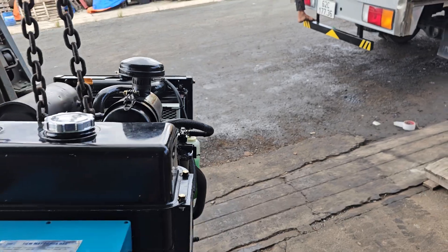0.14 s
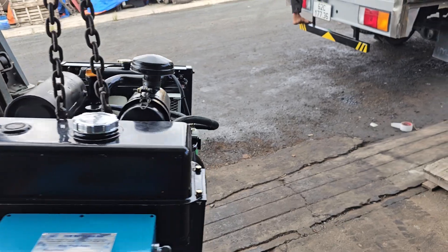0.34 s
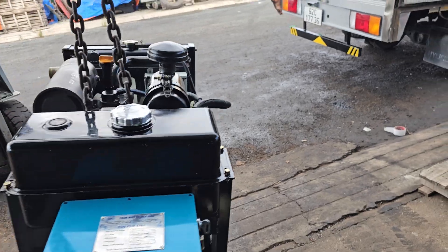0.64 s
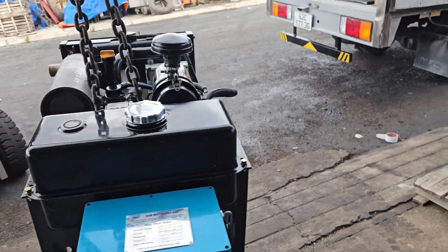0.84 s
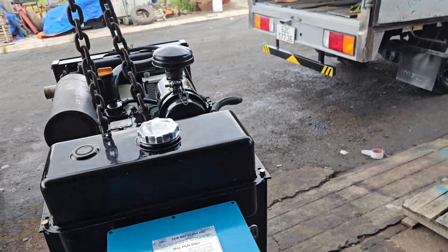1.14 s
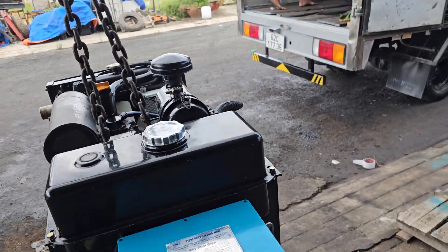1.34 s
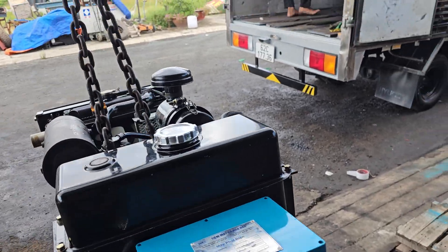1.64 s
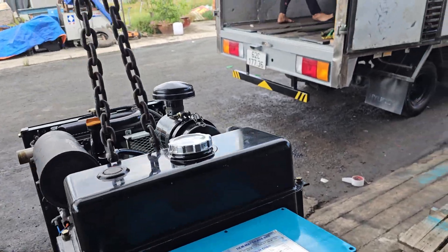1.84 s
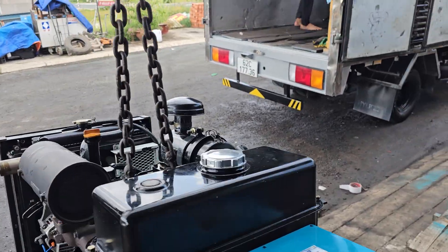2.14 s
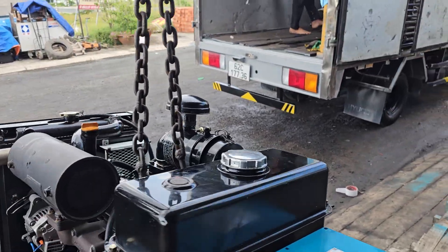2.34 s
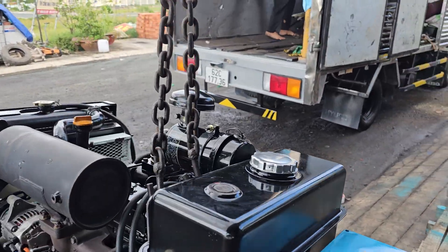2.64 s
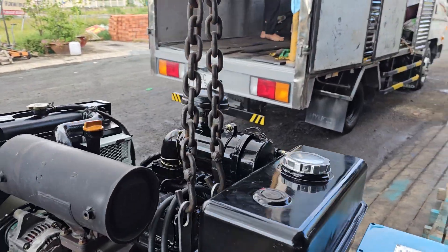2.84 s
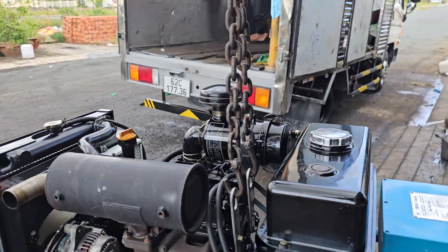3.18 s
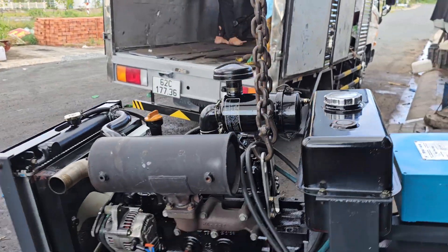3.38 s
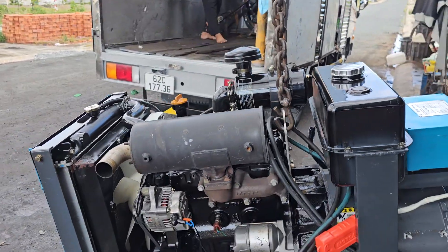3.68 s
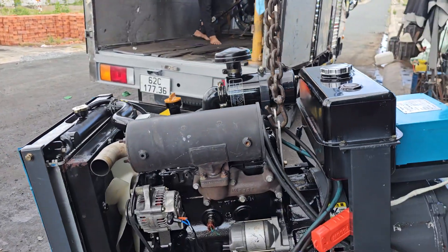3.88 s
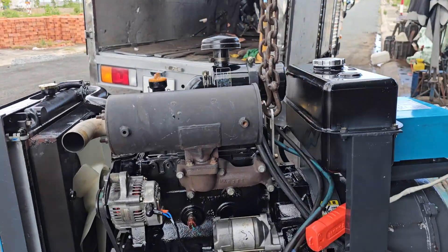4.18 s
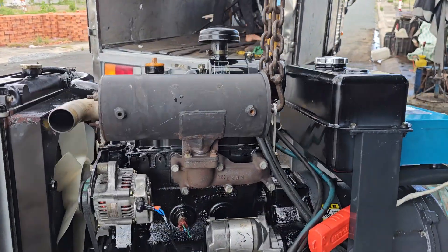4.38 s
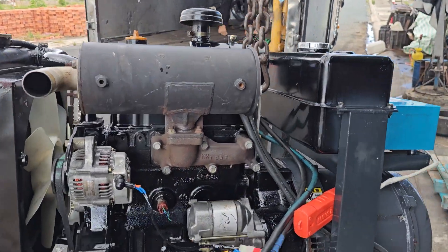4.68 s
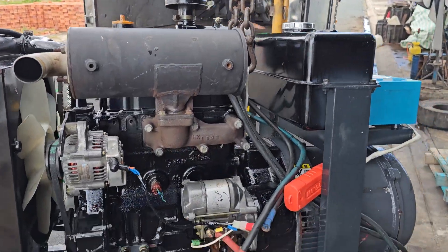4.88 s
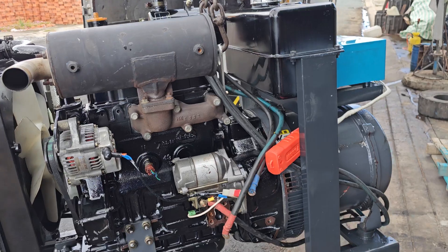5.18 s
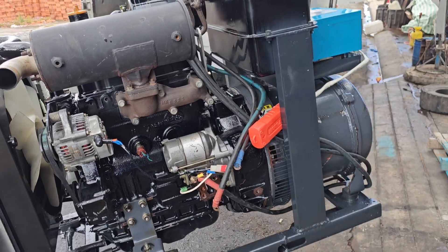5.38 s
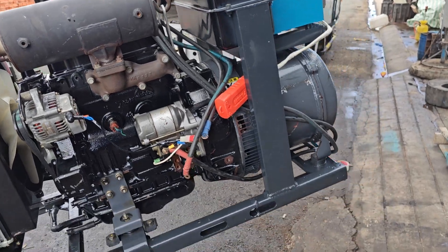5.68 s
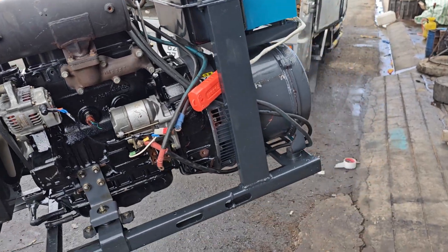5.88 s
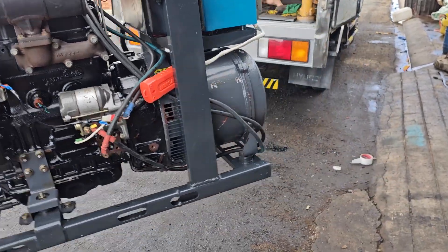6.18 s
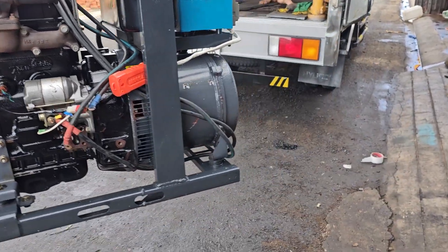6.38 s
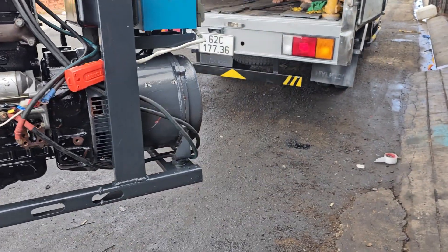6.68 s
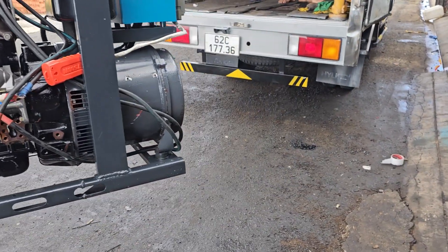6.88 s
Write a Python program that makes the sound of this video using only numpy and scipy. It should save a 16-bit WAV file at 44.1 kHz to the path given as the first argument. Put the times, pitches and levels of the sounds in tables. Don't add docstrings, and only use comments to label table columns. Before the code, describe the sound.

A diesel forklift clatters and knocks at lifting revs with a pulsing high hydraulic whine, a brief squeak, chain clinks and a late metallic jolt.

```python
import sys
import numpy as np
from scipy import signal
from scipy.fft import rfft, irfft, next_fast_len
from scipy.io import wavfile
from scipy.ndimage import uniform_filter1d, minimum_filter1d, map_coordinates

SR = 44100
rng = np.random.default_rng(int(sys.argv[2]) if len(sys.argv) > 2 else 0)


def master(y):
    cut = np.clip(np.atleast_2d(y).T, -1, 1)
    pcm = np.round(cut * 32767)
    wavfile.write(sys.argv[1], SR, pcm.astype(np.int16))


def voltage_ratio(level):
    return 10 ** (np.asarray(level, float) / 20)


N = 309582

# t/s, firings so far/count
CRANK = [(0.0, 0.5), (0.4, 9.17), (0.8, 17.98), (1.0, 22.14), (1.2, 26.45), (1.4, 30.51), (1.8, 39.22),
         (2.2, 48.64), (2.4, 53.62), (3.0, 68.87), (3.2, 73.79), (3.4, 78.25), (3.6, 82.35), (4.0, 90.64),
         (4.4, 98.76), (5.4, 119.46), (6.2, 135.92), (7.02, 152.74)]
# t/s, bearing round the truck/deg, effort/dB, oil pressure/dB, tailpipe nearness/dB
WALK = [(0, 40, -17.5, -12, -16), (.42, 82, -2.5, 5, -5), (.75, 52, 9, 7.5, 0.5), (1.15, 89, 2, 2, -1.5),
        (1.5, 30, 3.5, .5, 0), (1.85, 38, -3.5, -1.5, -2.5), (2.2, 22, -2.5, -4.5, 0),
        (2.55, 34, -4, 1, 1.5), (3.38, 3.6, -4, -6.5, 2.2), (3.62, 93, -4, 2.5, 1.5),
        (4.05, 138, -0.5, 4, 3.5), (4.3, 153, -3, -4, 2), (4.9, 154, -1, -1, 2.5), (5.47, 163, -2, 2, 2),
        (5.7, 261, 1.5, 1.5, -8), (6.55, 298, -5.5, -0.5, -9.5), (6.78, 158, -0.5, 7.5, -6),
        (7.02, 42, 0, -0.5, -8)]
# silencer/dB, sump/dB, sump wall/dB, cover/dB, clatter/dB
CYLINDERS = [(-1, 1.5, -8.5, 4, 9.5), (-5, -8, -0.5, 6, 8.5), (-4, -2.5, -5.5, 0.5, 7.5),
             (-7, -5, 2.5, -5.5, 5)]
EVEN = np.zeros(len(CYLINDERS))
# t/s, sump level/dB, cover level/dB, valve gear level/dB
BANGS = [(.029, -4.5, 12, 1), (.075, 1, 0, 6.5), (.121, 11, -1, 8), (.352, 4, 7, 5), (.716, -1.5, 3.5, 3.5),
         (.761, -5.5, 0.5, 4.5), (.999, 4, 7.5, -4.5), (1.38, 4, 12, 0.5), (1.657, 2, 5, -6),
         (1.966, 3.5, -4, 0.5), (2.052, 0, 2, -6), (2.094, 0.5, 4, -5.5), (2.137, 2, 3, -2),
         (2.179, -2, 5, 1.5), (2.462, 5.5, -3, 3), (2.502, 0, 9.5, 5.5), (2.818, 4, 9.5, 2.5),
         (3.2, 4, 1, 0), (3.539, 2.5, -1, 0.5), (4.27, 6, 0.5, 1), (5.238, 9, 5.5, 4),
         (5.626, -2.5, -1.5, 2), (5.918, 3.5, -1.5, 7), (5.967, 1, -11.5, 2.5), (6.064, 3.5, 0, 5),
         (6.306, 0.5, 5, 4.5), (6.598, 1, 3.5, 5), (6.694, -16, 12, 12.5), (6.985, 1.5, 3.5, 2.5)]
# multiple of firing rate, idle level/dB, revved level/dB, idle phase/rad, revved phase/rad
EXHAUST_ORDERS = [(2, -1.5, -1, 0.83, -1.5), (3, -2, -5.5, -0.71, -1.4), (4, 0, 5, 0.61, -0.84),
                  (5, -8.5, -6, 1, 1.1)]
# f/Hz, width/Hz, level/dB
PIPE = [(61.4, 35.5, 9.5), (111, 47, 7)]
SILENCER = [(189.4, 39.9, 5), (202.5, 42, 2.5), (245, 11, -11.5)]
SUMP = [(500.9, 13.3, 3), (417.6, 47, -15.5)]
SUMP_WALL = [(566.8, 16.5, 3.5), (668, 50, -16.5)]
COVER = [(740, 71, -2.5), (791.4, 23.9, 6.5), (874.7, 18.8, 2), (954, 44, -13.5)]
CLATTER = [(1324.4, 87, 0.5), (1494, 56, -0.5), (1644, 90, -4)]
# f/Hz, width/Hz
PANELS = [(360, 190), (1065, 79), (2040, 430)]
# f/Hz, level/dB
FIZZ = [(2500, -120), (2900, 12), (3450, 19), (3900, 10), (4100, -30), (4600, -120)]
# t/s, f/Hz
PUMP = [(0.0, 3746), (0.15, 3692), (0.3, 3300), (0.45, 3359), (0.6, 3118), (0.9, 3080), (1.05, 2759),
        (1.2, 3003), (1.35, 2719), (1.5, 2817), (1.8, 2742), (2.35, 2930), (2.7, 3010), (3.05, 3208),
        (3.75, 2932), (4.45, 2790), (5.6, 2735), (7.02, 2780)]
# t/s, peak level/dB, t60/s
LINKS = [
    (0.7388, -12.5, 0.039),
    (1.093, -19.5, 0.12),
    (1.471, -5, 0.031),
    (4.361, -3.5, 0.069),
    (5.717, -17, 0.02),
    (6.058, -17.5, 0.06),
    (6.4, -11.5, 0.096),
    (6.74, -6.5, 0.11),
    (6.7903, -1.5, 0.054),
]
# f/Hz, width/Hz, level/dB
LINK_MODES = [(4816, 30, -24.5), (4705, 110, -6), (5125, 360, -2), (5440, 190, -12.5)]
# f/Hz, level/dB
STEEL = [(3800, -120), (4200, 2.5), (4800, 1.5), (6200, -3.5), (6800, -14.5), (7200, -51.5), (7600, -120)]
# t/s, level/dB
SHAKES = [(.03, -54), (.4, -52), (0.759, -36), (1.095, -35), (1.47, -31.5), (1.84, -41.5), (2.43, -34.5),
          (2.82, -45.5), (4.37, -52), (6.064, -44.5), (6.405, -47), (6.78, -48)]
# t/s, peak level/dB, f/Hz
SNAPS = [
    (2.4406, -5.5, 3970),
]
# t/s, f/Hz, level/dB
SQUEAK = [
    (.82, 2200, -120),
    (.93, 2130, -29),
    (1.03, 1965, -37),
    (1.14, 2193, -33),
    (1.22, 2180, -30),
    (1.28, 2100, -38),
    (1.34, 2180, -120),
]
# f/Hz, width/Hz, level/dB
SCRAPE = [(594, 23, -6.5), (692, 7.1, 5), (1260, 35, -9), (1550, 500, -22.5), (2075, 100, -14),
          (2660, 800, -28), (3980, 90, -20)]
# level/dB, bearing faced/deg, swing with bearing/dB,
# loss in a full shut of the suppressor/dB, power bending that loss
THUMP_OUT = (-21.5, 106.5, 1.3, 23.5, 1.45)
RING_OUT = (-24, 55, 0.5, 24, 1.6)
SUMP_OUT = (-11.5, 184.5, 0.5, 33.5, .98)
COVER_OUT = (-17.5, 305.5, 0, 28.5, 1.4)
CLATTER_OUT = (-22.5, 342, 1.5, 20.5, 0.82)
FIZZ_OUT = (-41, 12.5, 9, 32, 0.85)
TONE_OUT = (-25, 40, 1, 17, 1.28)
OCTAVE_OUT = (-36, 38, 3, 31.5, 1.65)
# level/dB, bearing faced/deg, swing/dB
PANELS_OUT = [(-17.5, 13, 9), (-18, 137, 15), (-13.5, 61, 9)]
# deepest t/s, depth/dB, closing/s, reopening/s
SHUTS = [(0.127, 26, 0.11, 0.02), (0.272, 16, 0.34, 0.17), (0.589, 33, .22, 0.23), (0.938, 37.5, 0.23, .14),
         (1.288, 33.5, .16, 0.2), (1.614, 24, .13, 0.17), (1.928, 12, 0.056, 0.23), (2.3, 6.5, 0.1, 0.48),
         (2.64, 3, 0.075, 0.21), (3.43, 4, .4, 0.049), (3.65, 0.5, 0.06, 0.067), (4.3, -21, 0.15, 0.11),
         (5.14, 4, 0.072, .09), (5.56, 8.5, 0.14, 0.036), (5.879, 15, 0.2, .17), (6.198, 9, 0.2, 0.27),
         (6.551, 13, 0.12, 0.1), (6.91, 25.5, .13, 0.13)]
# f/Hz, level per bin/dB
GATE = [(300, -61), (2500, -54), (5000, -78)]

THUMP_LAG_S, RING_LAG_S, PUMP_LAG_S = .058, .045, .02
CLOSE_BEND, REOPEN_BEND, FULL_SHUT_DB = 0.88, 1.34, 30
RING_LEAD_S, REV_RING_DB = .1, 6.5
LUMPY_UNTIL_S, FIZZ_LUMPY_S = 2.3, 2.1
ODD_COVER_DB, ODD_FIZZ_DB, REV_FIZZ_DB = -9, 4, -12.5
OCTAVE_IN_S, EARLY_OCTAVE_DB = .68, -30.5
SHAKE_RISE, SHAKE_FALL, SLACK_DB = 350, 180, -70
TOP_HZ = 7200


def exhaust():
    t, rev = np.arange(N) / SR, revved()
    firings = curves(CRANK)[0]
    thump_db = heard(THUMP_OUT, t, curves(WALK)[3], THUMP_LAG_S)
    ring_near_db = 1.15 * curves(WALK, t + RING_LEAD_S)[3]
    ring_db = heard(RING_OUT, t, ring_near_db + REV_RING_DB * rev, RING_LAG_S)
    turn = 2 * np.pi * firings + 0.015 * wobble(17)
    orders = np.zeros(N)
    for k, idle_db, rev_db, idle_rad, rev_rad in EXHAUST_ORDERS:
        level = voltage_ratio(idle_db + (rev_db - idle_db) * rev)
        orders += level * np.cos(k * turn + idle_rad + (rev_rad - idle_rad) * rev)
    rough = filtered(blows(.3, EVEN, 0.96, 0.026, -31, crisp=0.81), body(PIPE))
    thump = unit(unit(orders) + voltage_ratio(-5) * unit(rough))
    silencer_db = np.transpose(CYLINDERS)[0]
    ring = knock(SILENCER, 150, 260, .05, silencer_db, 2, .01, -17, crisp=.7)
    return voltage_ratio(thump_db) * thump + voltage_ratio(ring_db) * ring


def block():
    _, sump_db, wall_db, cover_db, clatter_db = np.transpose(CYLINDERS)
    number, _, when = firing(0.12)
    effort_db = curves(WALK, when)[1]
    odd = number % 2 * (when < LUMPY_UNTIL_S)
    sump_bang, cover_bang, gear_bang = sum(np.outer(db, abs(when - s) < .022) for s, *db in BANGS)

    sump = held(heard(SUMP_OUT, when, effort_db + sump_bang))
    cover = held(heard(COVER_OUT, when, effort_db + cover_bang + ODD_COVER_DB * odd))
    clatter = held(heard(CLATTER_OUT, when, 0.96 * effort_db + gear_bang))
    fizz_drive_db = 0.61 * effort_db + 1.1 * gear_bang + REV_FIZZ_DB * np.sqrt(revved())
    fizz_drive_db += ODD_FIZZ_DB * odd * (when < FIZZ_LUMPY_S)
    fizz = held(heard(FIZZ_OUT, when, fizz_drive_db))

    out = sump * voltage_ratio(-2) * knock(SUMP, 420, 800, .13, sump_db, 2, .007, -19, crisp=-.75)
    out += sump * voltage_ratio(-4.5) * knock(SUMP_WALL, 420, 800, .15, wall_db, 2, .007, -19, crisp=-.75)
    out += cover * knock(COVER, 770, 1100, .19, cover_db, 1, 0.024, -11, crisp=0.38)
    out += clatter * knock(CLATTER, 2400, 2400, .2, clatter_db, 2.6, 0.0093, -11, crisp=0.072)
    for (hz, width), part, near in zip(PANELS, PANELS_OUT, [sump, clatter, clatter]):
        panel = knock([(hz, width, 0)], hz, hz, 0.25, EVEN, 2.6, 0.056, -9, crisp=0.05)
        out += near * voltage_ratio(faced(*part, np.arange(N) / SR)) * panel
    gas = blows(0.27, EVEN, 2.6, 0.025, -30, crisp=.02)
    return out + fizz * voltage_ratio(8) * unit(filtered(gas, colour(FIZZ)))


def whine():
    when = firing(0.22)[2]
    oil_db = curves(WALK, when)[2]
    level = held(heard(TONE_OUT, when, oil_db, PUMP_LAG_S))
    octave_drive_db = 0.53 * oil_db + EARLY_OCTAVE_DB * (when < OCTAVE_IN_S)
    octave = held(heard(OCTAVE_OUT, when, octave_drive_db, PUMP_LAG_S))

    since = firing(0.38)[1]
    flare = (since / .012) ** 2 * np.exp(2 - 2 * since / .012)
    sag = 0.0073 * np.cos(np.pi * np.minimum(since / 0.015, 1)) + 0.0053 * wobble(30)
    phase = 2 * np.pi * np.cumsum(curves(PUMP)[0] * (1 + sag)) / SR

    tone = flare * voltage_ratio(2.5 * wobble(120)) * np.sin(phase)
    tone += (.17 + .22 * flare) * rough_band(phase, 300)
    upper = flare ** 1.5 * voltage_ratio(2.5 * wobble(120)) * np.sin(2 * phase)
    upper += (.09 + .15 * flare) * rough_band(2 * phase, 400)
    hiss = (0.22 + flare) * rough_band(2 * phase * .97, 900)
    return level * unit(tone) + octave * (unit(upper) + voltage_ratio(-5.5) * unit(hiss))


def chain():
    rasp, snaps = np.zeros(N + SR), np.zeros(N + SR)
    t = np.arange(SR // 4) / SR
    for s, db, t60 in LINKS:
        decay = voltage_ratio(db + 10.5 - 60 * t / t60) + voltage_ratio(db - 4.5 - 60 * t / (4 * t60))
        rasp[round(s * SR):][:len(t)] += decay * rng.standard_normal(len(t))
    for s, db, hz in SNAPS:
        tones = 1.39 * np.sin(2 * np.pi * hz * t) + 0.48 * np.sin(2 * np.pi * 1.6 * hz * t)
        snaps[round(s * SR):][:len(t)] += voltage_ratio(db - 60 * t / 0.011) * tones * (1 - np.exp(-t / 0.0011))
    clinks = filtered(rasp[:N], lambda f: body(LINK_MODES)(f) / (1 + ((f - 4950) / 500) ** 4))

    rattle = unit(filtered(blows(0.12, EVEN, 1.8, 0.033, -4.5, crisp=.01), colour(STEEL)))
    when = firing(0.069)[2]
    jolts_db = [db - np.maximum(SHAKE_RISE * (s - when), SHAKE_FALL * (when - s)) for s, db in SHAKES]
    shaken_db = np.maximum(np.max(jolts_db, axis=0), SLACK_DB)
    return clinks + snaps[:N] + held(shaken_db) * voltage_ratio(1.5) * rattle


def mast():
    hz, db = curves(SQUEAK)
    squeak = voltage_ratio(db) * wobble(400) * np.sin(2 * np.pi * np.cumsum(hz) / SR)
    t = np.maximum(np.arange(N) / SR - 6.68, 0)
    drag = (1 - np.exp(-t / 0.0056)) * np.exp(-(t / 0.099) ** 2) * rng.standard_normal(N)
    return squeak + voltage_ratio(14) * filtered(drag, body(SCRAPE))


def firing(lead):
    t = np.arange(N) / SR
    turns = curves(CRANK)[0] + lead
    number = np.floor(turns)
    began = np.interp(number, turns, t)
    return number.astype(int), t - began, began + 0.0063


def revved():
    rate = uniform_filter1d(np.gradient(curves(CRANK)[0]) * SR, size=8000)
    return np.clip((rate - 21) / 4, 0, 1)


def blows(lead, sizes_db, scatter_db, decay_s, hiss_db, crisp):
    number, since, _ = firing(lead)
    size = voltage_ratio(np.asarray(sizes_db)[number % 4] + scatter_db * rng.standard_normal(200)[number])
    push = crisp * 30 * (np.diff(number, prepend=number[0]) > 0)
    burst = np.exp(-since / decay_s) * (1 - np.exp(-since / 0.0025)) * rng.standard_normal(N)
    return size * (push + burst) + voltage_ratio(hiss_db) * rng.standard_normal(N)


def knock(modes, low_hz, high_hz, *blow, crisp):
    response = lambda f: body(modes)(f) * between(low_hz, high_hz)(f)
    return unit(filtered(blows(*blow, crisp=crisp), response))


def body(modes):
    def response(f):
        total = 0
        for k, (hz, width, db) in enumerate(modes):
            damping = 1j * f * width
            total = total + (-1) ** k * voltage_ratio(db) * damping / (hz * hz - f * f + damping)
        return total
    return response


def between(low_hz, high_hz):
    def response(f):
        high_pass = (1j * f / low_hz) ** 2 / (1 + 1j * f / low_hz) ** 2
        return high_pass / (1 + 1j * f / high_hz) ** 2 / (1 + (f / (2 * high_hz)) ** 6)
    return response


def colour(points):
    hz, db = np.transpose(points)
    return lambda f: voltage_ratio(np.interp(np.log(f + 1), np.log(hz), db))


def filtered(x, response):
    m = next_fast_len(N + SR // 2)
    return irfft(rfft(x, m) * response(np.fft.rfftfreq(m, 1 / SR)), m)[:N]


def rough_band(phase, rate):
    return wobble(rate) * np.sin(phase) + wobble(rate) * np.cos(phase)


def wobble(rate):
    return map_coordinates(rng.standard_normal(int(N * rate / SR) + 4), [np.arange(N) * rate / SR])


def curves(rows, when=None):
    s, *cols = np.transpose(rows)
    when = np.arange(N) / SR if when is None else when
    return [np.interp(when, s, c) for c in cols]


def unit(x):
    return x / np.sqrt(np.mean(x ** 2) + 1e-20)


def faced(db, aim, swing_db, when):
    return db + swing_db * np.cos(np.radians(curves(WALK, when)[0] - aim))


def heard(part, when, drive_db=0, lag=0):
    db, aim, swing_db, loss_db, bend = part
    t = np.arange(-.1, N / SR + .1, .002)
    shut_db = []
    for s, depth, close, reopen in SHUTS:
        closing = np.clip(1 - (s - t) / close, 0, 1) ** CLOSE_BEND
        reopening = np.clip(1 - (t - s) / reopen, 0, 1) ** REOPEN_BEND
        shut_db.append(depth * np.where(t < s, closing, reopening))
    shut = (np.max(shut_db, axis=0) / FULL_SHUT_DB) ** bend
    return faced(db, aim, swing_db, when) + drive_db - loss_db * np.interp(when - lag, t, shut)


def held(db):
    return uniform_filter1d(voltage_ratio(db), size=200)


def suppressed(x):
    hz, _, z = signal.stft(x, SR, nperseg=512, noverlap=384)
    power = uniform_filter1d(uniform_filter1d(np.abs(z) ** 2, size=4, axis=0), size=9, axis=1)
    drift = uniform_filter1d(rng.standard_normal(z.shape), size=5, axis=0)
    drift = uniform_filter1d(drift, size=40, axis=1)
    noise = (colour(GATE)(hz)[:, None] * voltage_ratio(7 * unit(drift))) ** 2
    gain = np.maximum(power / (power + noise), voltage_ratio(-34.5))
    return signal.istft(z * gain, SR, nperseg=512, noverlap=384)[1][:N]


def scene():
    return (exhaust() + block() + whine() + chain() + mast())[None]


def roll_off(x):
    return signal.sosfilt(signal.butter(12, 7350, fs=SR, output="sos"), x)


def record(dry):
    need = np.minimum(1, .99 / (np.abs(dry[0]) + 1e-9))
    gain = uniform_filter1d(minimum_filter1d(need, size=401), size=401)
    x = suppressed(dry[0] * gain)
    x = filtered(x, lambda f: 1 / (1 + (f / TOP_HZ) ** 60) * f ** 4 / (f ** 4 + 38 ** 4))
    return roll_off(np.clip(x, -1, 1)[None])


dry = scene()
out = record(dry)
master(out)
```